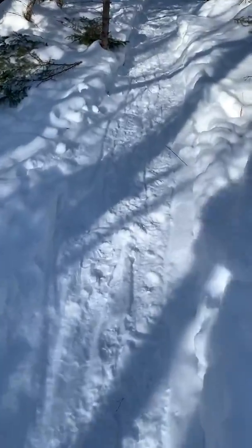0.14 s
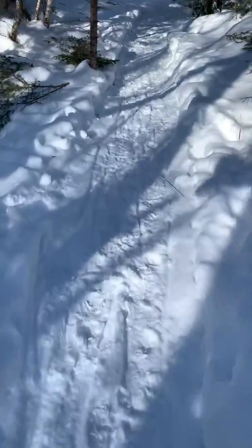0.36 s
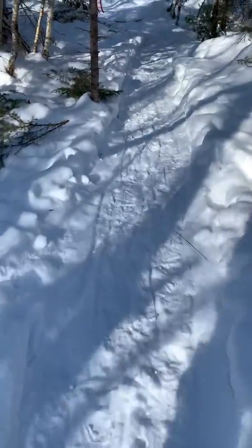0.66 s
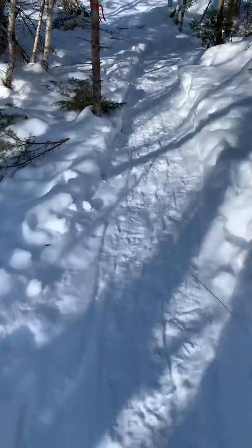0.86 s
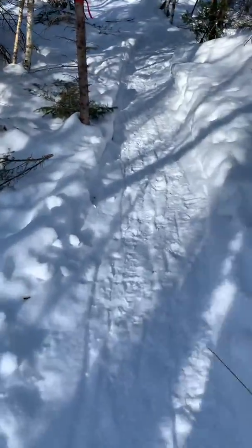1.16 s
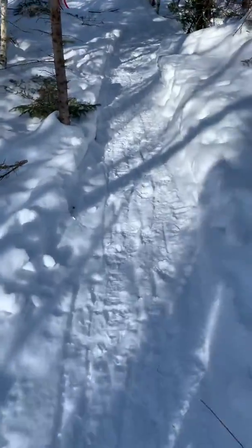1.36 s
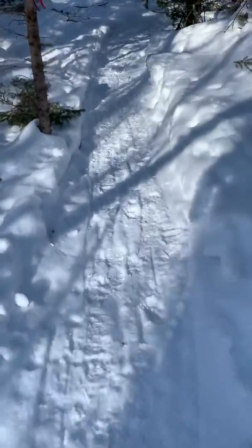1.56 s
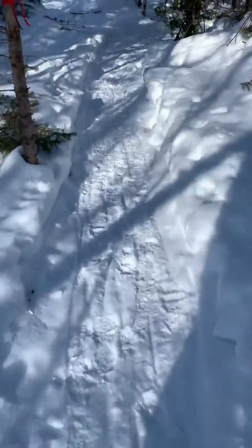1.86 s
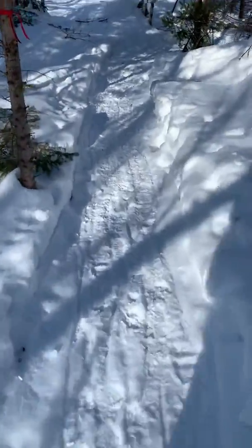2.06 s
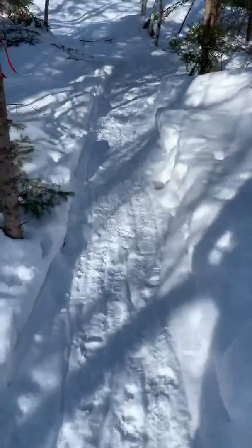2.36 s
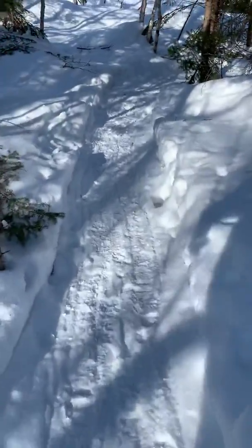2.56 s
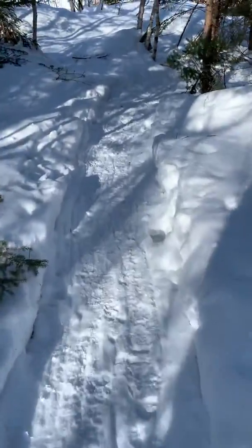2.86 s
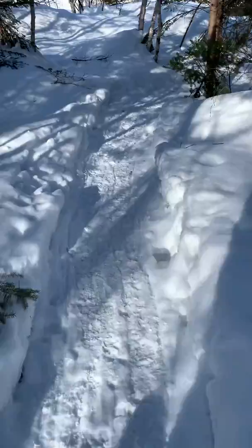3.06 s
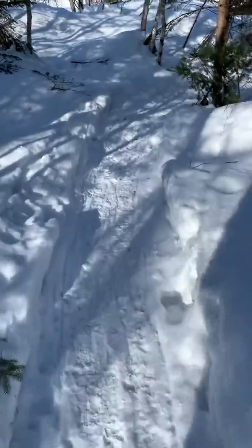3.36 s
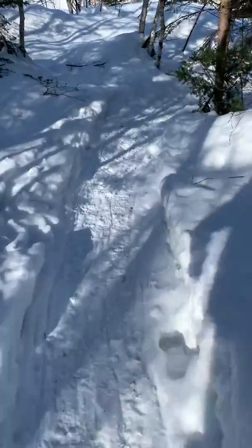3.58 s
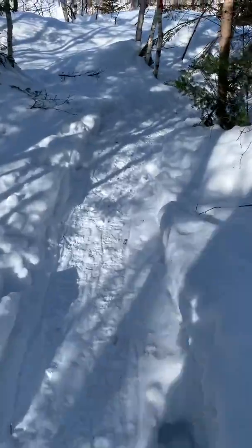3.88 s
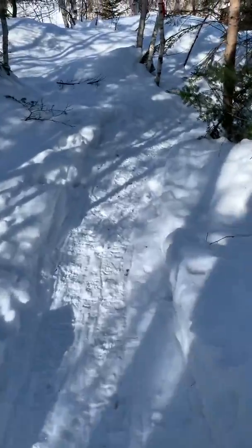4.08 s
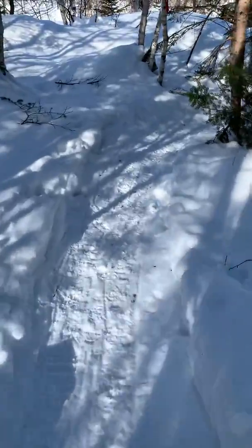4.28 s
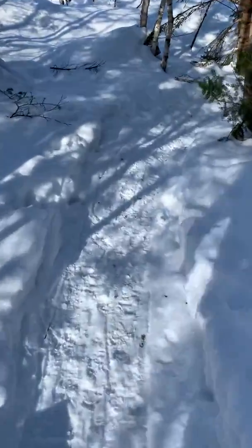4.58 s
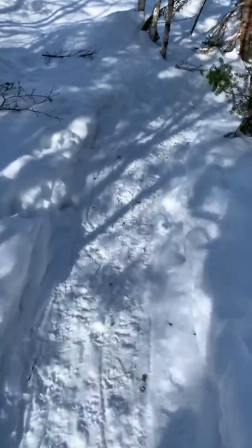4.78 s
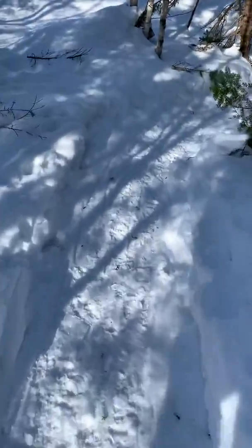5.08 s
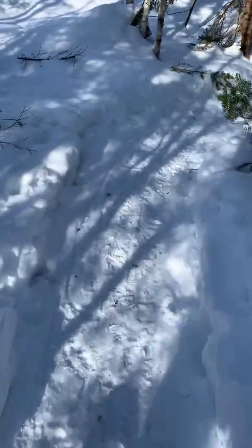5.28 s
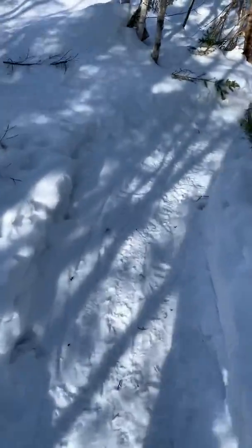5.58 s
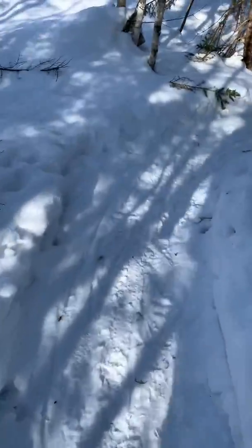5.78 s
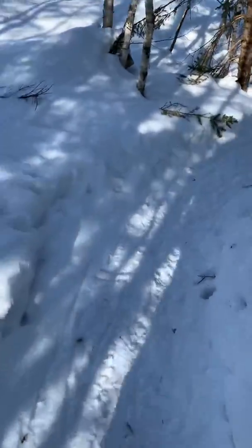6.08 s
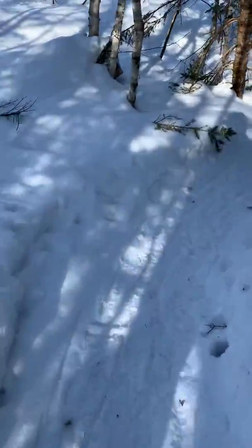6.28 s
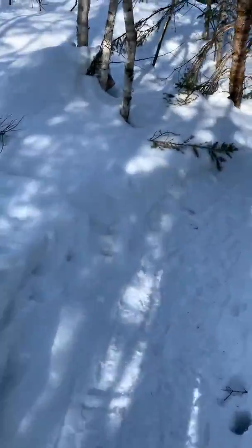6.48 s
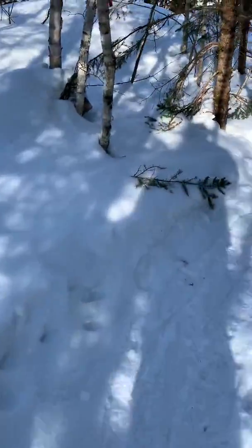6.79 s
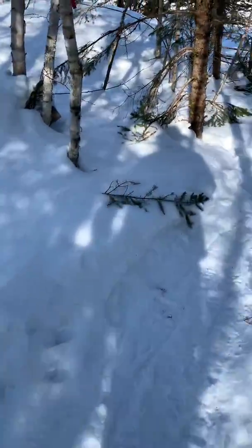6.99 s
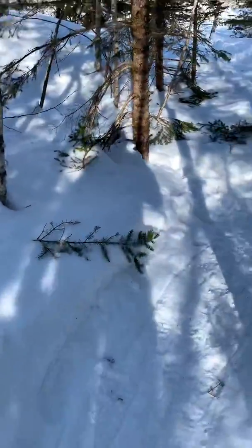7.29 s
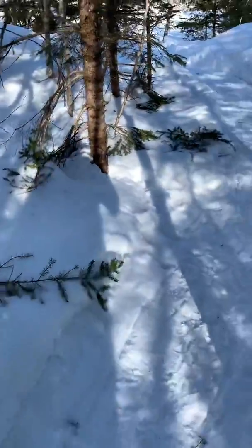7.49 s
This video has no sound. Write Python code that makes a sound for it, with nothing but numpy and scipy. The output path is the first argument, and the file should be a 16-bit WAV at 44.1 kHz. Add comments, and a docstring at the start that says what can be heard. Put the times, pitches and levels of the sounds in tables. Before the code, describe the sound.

Boots walk steadily over crusty snow in open air, starting with a faint scuff before the first step. Hollow mid-pitched knocks and bright icy snaps break through dense, gritty crunching, then each step dies quickly into near silence with small scuffs and sparse crumbs ticking. A handheld phone picks it up from above in narrow stereo, without echo, with a slight low jolt early on.

```python
"""A packed snow trail in a still forest, heard on a phone at chest height pointing down at the feet.
First the trailing boot brushes the snow: soft noise and hollow resonances, again between later steps.
Then come the footfalls, heel before ball: dull falling knocks of crust, a crunch of many small ringing
breaks, a fizz of dense tiny clicks as ice grains crush, and a low noise thud from the ground.
Low jolts of the phone pass early on, bright snaps throughout; two ports hear it all a little apart."""
import sys
import numpy as np
from scipy import signal
from scipy.fft import rfft, irfft
from scipy.io import wavfile
from scipy.ndimage import uniform_filter1d

SR = 44100
rng = np.random.default_rng(int(sys.argv[2]) if len(sys.argv) > 2 else 0)


def output_pcm(signal):
    """Save a mono or channel-first signal as 16-bit PCM at the path in sys.argv[1].

    Samples are clipped to [-1, 1] before scaling.
    """
    pcm = np.clip(np.atleast_2d(signal).T, -1, 1) * 32767
    wavfile.write(sys.argv[1], SR, np.round(pcm).astype(np.int16))


N = 336924
STEP = 16  # samples per point of a level curve

# Heel, then ball of the foot, pressing into the trail; levels before the sag under load:
# start_s, rise_s, length_s, fizz_db, soft_crunch_db, hard_crunch_db, thud_db
PRESSES = [(0.25, 0.09, 0.19, -18.5, -42, -28.5, -68), (0.38, 0.058, 0.076, -19.5, -24.5, -23, -33.5),
           (0.748, 0.069, 0.11, -18.5, -62, -28, -63), (0.845, 0.055, 0.15, -18, -26, -28, -38),
           (1.299, 0.081, 0.11, -11, -54, -21, -56), (1.411, 0.0035, 0.1, -29.5, -34, -32, -43.5),
           (1.85, 0.11, 0.16, -17.5, -53, -25, -44), (2.007, 0.054, 0.073, -20.5, -21, -30.5, -34),
           (2.455, 0.029, 0.21, -21.5, -33.5, -26, -44), (2.566, 0.041, 0.073, -23.5, -27, -25.5, -45),
           (3.019, 0.025, 0.083, -16.5, -29.5, -25.5, -31.5), (3.113, 0.031, 0.081, -23.5, -28.5, -31, -36),
           (3.553, 0.11, 0.21, -16, -29, -29.5, -42), (3.694, 0.07, 0.094, -18.5, -25.5, -22, -28.5),
           (4.127, 0.019, 0.19, -21.5, -51, -27.5, -49), (4.24, 0.094, 0.064, -17, -22, -19, -49),
           (4.684, 0.028, 0.2, -16.5, -27, -25, -60), (4.785, 0.036, 0.083, -23, -27.5, -24.5, -38),
           (5.222, 0.084, 0.14, -15.5, -29, -24, -63), (5.348, 0.069, 0.048, -16.5, -17.5, -21, -36),
           (5.764, 0.11, 0.15, -14.5, -22.5, -24, -63), (5.909, 0.03, 0.066, -20.5, -22.5, -23, -33),
           (6.299, 0.087, 0.15, -11.5, -57, -19, -40), (6.415, 0.049, 0.1, -23.5, -22, -35.5, -42),
           (6.92, 0.015, 0.11, -21.5, -39, -28.5, -73), (7.037, 0.016, 0.1, -22, -36, -27, -70),
           (7.481, 0.05, 0.19, -20, -33.5, -28.5, -42)]
# Resonances of soft crust as the ports colour it: pitch_hz, width_hz, relative_db
SOFT_CRUST = [(347, 150, -2.5), (533, 97, 4.5), (764, 204, -1.5)]
# Resonances of the harder icy layer: pitch_hz, width_hz, relative_db
HARD_CRUST = [(1390, 1670, -1.5), (1843, 340, -2)]
SOFT_SAG, HARD_SAG = 100, 75.6  # fading while the boot bears down (dB per s)
SOFT_REST_DB, HARD_REST_DB = -53.5, -67.5  # the trailing foot between contacts
CRACKLE_DB = 0.5  # separate small breaks inside a step, relative to both layers


def crunch():
    """Soft crust and its harder icy layer give way together under the load of the foot."""
    drive = clumps(8, 3.5)
    fitful = clumps(20, 1.27)  # loose snow settles in fits and starts
    soft = contact(PRESSES, column=4, sag_db_per_s=SOFT_SAG, rest_db=SOFT_REST_DB) * fitful
    soft = soft + crumbling(t60=0.13)
    hard = contact(PRESSES + SCUFFS, column=5, sag_db_per_s=HARD_SAG, rest_db=HARD_REST_DB) * fitful
    hard = hard + gain_of(-2.0) * crumbling(t60=0.03)
    small = gain_of(CRACKLE_DB) * np.sqrt(soft * hard) * crackles()
    soft_breaks = breaks(SOFT_CRUST, 700, 3.75, drive)
    hard_breaks = breaks(HARD_CRUST, 1100, 2.06, drive)
    return soft * soft_breaks + hard * hard_breaks + small


CRACKLES_PER_S, CRACKLE_HZ = 170, (430, 950)  # total over all notes; lowest and highest note


def crackles():
    """Small uneven versions of the loud breaks, to be scattered through every step."""
    notes = np.geomspace(*CRACKLE_HZ, num=6)
    shapes = [knock(hz, 0.1, -9.5, turn) for hz, turn in zip(notes, rng.random(len(notes)))]
    per_note = CRACKLES_PER_S / len(notes)
    return evened(sum(signal.oaconvolve(clicks(per_note, 1.9), shape)[:N] for shape in shapes))


# Slabs of crust breaking; levels before the trims in knock():
# start_s, level_db, pitch_hz, bright_db
CRACKS = [(0.226, -16, 530, -53), (0.2595, -5, 575, -39), (0.272, -16, 264, -31), (0.309, -13, 537, -17.5),
          (0.333, -18, 770, -36), (0.404, -8.5, 700, -25), (0.44, -15, 470, -16), (0.474, -13, 547, -42),
          (0.65, -17, 527, -45), (0.769, -19, 530, -32), (0.791, 1, 512, -6.5), (0.899, -7, 790, -18),
          (0.924, -12, 635, -16), (1.195, -26, 510, -45), (1.3138, -8, 570, -11.5),
          (1.3437, -11.5, 640, -9), (1.367, -11, 930, -8), (1.402, -9.5, 480, -30), (1.417, -11, 535, -11),
          (1.508, -19.5, 497, -35), (1.758, -19.5, 530, -18.5), (1.777, -12, 473, -14),
          (1.8551, -1.5, 630, -11.5), (1.903, 0.5, 563, -12), (2.031, -7.5, 515, -21),
          (2.067, -14, 484, -18), (2.08, -15, 617, -14.5), (2.142, -25, 640, -38), (2.216, -36, 600, -42),
          (2.285, -29, 610, -57), (2.332, -38, 594, -50), (2.263, -26, 815, -28), (2.302, -58, 620, -30),
          (2.381, -45, 540, -35), (2.419, -45, 697, -38), (2.454, -11, 570, -15.5), (2.468, -19, 577, -32),
          (2.483, -14.5, 485, -21), (2.585, -15, 510, -19), (2.616, -20, 600, -18), (2.919, -13, 450, -34),
          (3.023, -10, 523, -30), (3.134, -11, 640, -25), (3.161, -11.5, 730, -34), (3.481, -16, 536, -23),
          (3.582, -8, 570, -29), (3.691, -14, 564, -20), (3.728, -9.5, 550, -31), (3.799, -12, 606, -38),
          (3.966, -28, 517, -57), (4.067, -52, 507, -22.5), (4.092, -17, 507, -35),
          (4.1252, -2.5, 550, -19), (4.139, -7.5, 515, -13.5), (4.22, -18.5, 730, -21),
          (4.2555, -13, 726, -16.5), (4.2675, -1.5, 598, -15), (4.378, -40, 600, -30),
          (4.454, -34, 560, -37), (4.481, -35, 550, -33), (4.546, -49, 500, -50), (4.623, -17.5, 511, -38),
          (4.6835, -9, 596, -23), (4.717, -11.5, 694, -36), (4.7523, -35, 555, -5.5),
          (4.781, -41, 525, -13), (4.806, -14.5, 860, -23), (4.844, -16, 594, -11), (5.096, -24, 477, -50),
          (5.194, -24, 486, -59), (5.244, -3, 558, -42), (5.364, -18, 560, -31), (5.396, -13, 620, -28),
          (5.645, -28, 544, -32), (5.69, -14, 550, -22), (5.781, -14, 550, -31), (5.795, -6.5, 525, -12),
          (5.927, -12, 515, -26), (5.946, -7.5, 850, -14), (6.215, -15.5, 480, -46),
          (6.287, -20, 1060, -26), (6.33, -4.5, 554, -34), (6.48, -10.5, 525, -16), (6.512, -29, 515, -28),
          (6.563, -15.5, 556, -31), (6.672, -36, 560, -39), (6.697, -25, 580, -53),
          (6.722, -21.5, 500, -55), (6.855, -22, 534, -51), (6.919, -15.5, 780, -24), (6.93, -12, 506, -37),
          (6.995, -12, 595, -18), (7.054, -17, 625, -17), (7.061, -3, 648, -14), (7.069, -7, 1000, -31),
          (7.119, -4.5, 534, -18), (7.495, -29, 533, -34), (7.519, -15.5, 556, -24)]


def cracks():
    """The loud single breaks, each a knock on its slab's own note."""
    out = np.zeros(N)
    for (s, db, hz, bright_db), turn in zip(CRACKS, rng.random(len(CRACKS))):
        add(out, s, knock(hz, db, bright_db, turn))
    return out


def knock(hz, db, bright_db, turn):
    """A break in the crust: the high part arrives first and the pitch sinks to the slab's note."""
    t = np.arange(900) / SR
    sweep = hz * t + 1.564 * (1 - np.exp(-t / 0.00096))
    # a few cycles, then the snow damps it
    swell = (1 - np.exp(-(t / 0.0016) ** 2)) * np.exp(-(t / 0.0052) ** 2)
    body = np.sin(2 * np.pi * (sweep + turn)) * swell
    edge_level = (1 - np.exp(-t * 3000)) * gain_of(bright_db + 1.5 - 60 * t / 0.012)
    edge = np.sin(2 * np.pi * (1550 + 400 * turn) * t) * edge_level
    tick_level = gain_of(bright_db - 7.0 - 60 * t / 0.0055)
    tick = np.sin(2 * np.pi * (2600 * t + 900 * t * turn)) * tick_level
    return gain_of(db - 6.0) * body / abs(body).max() + edge + tick


DEBRIS_DB, DEBRIS_SHARE = -18.5, 0.95  # base level, plus this share of the crack's dB


def crumbling(t60, share=DEBRIS_SHARE):
    """Level of debris giving way after each slab breaks, until the boot lifts and the grinding stops."""
    out, t = np.zeros(N // STEP + 1), np.arange(0, .2, STEP / SR)
    for s, db, *_ in CRACKS:
        decay = gain_of(DEBRIS_DB + share * db - 60 * t / t60)
        add(out, s, decay * (1 - np.exp(-(t / 0.003) ** 2)), rate=SR / STEP)
    return per_sample(out) / np.sqrt(1 + (gain_of(-35.5) / grinding()) ** 2)


# Spectrum of crushed ice grains: pitch_hz, relative_db (per Hz)
FIZZ = [(800, -0.5), (2000, 3.5), (3500, 2), (6000, 2.5), (8000, -2), (11000, -3.5), (15000, -6.5),
        (20000, 5.5)]
SPRAY_DB = -29  # grains thrown up by a snap, before onset and decay


def fizz():
    """Ice grains crushed and sliding: very dense tiny clicks, sprayed up again by every snap."""
    grains = patchy(coloured(clicks(9000, 2.8) * clumps(6.0, 2.5), FIZZ))
    spray, t = np.zeros(N), np.arange(6000) / SR
    for s, _ in SNAPS:
        add(spray, s, gain_of(SPRAY_DB - 60 * t / 0.018) * (1 - np.exp(-t * 900)))
    return (grinding() + spray) * grains


FIZZ_SAG, FIZZ_REST_DB = 111.6, -59.5  # dB per s under load; trailing foot between contacts


def grinding():
    """How hard ice grains are being crushed, by presses and scuffs alike."""
    return contact(PRESSES + SCUFFS, column=3, sag_db_per_s=FIZZ_SAG, rest_db=FIZZ_REST_DB)


PATCHY_DB = 3  # depth of the random swells in the fizz


def patchy(x):
    """Random patches of pitch and time swell and sink."""
    z = signal.stft(x, nperseg=256)[2]
    across_pitch = uniform_filter1d(rng.standard_normal(z.shape), size=4, axis=0)
    patches = evened(uniform_filter1d(across_pitch, size=5, axis=1))
    return evened(signal.istft(z * gain_of(PATCHY_DB * patches), nperseg=256)[1][:N])


# Spectrum of the packed base: pitch_hz, relative_db (per Hz)
THUD = [(25, -65), (50, -3.5), (130, 0.5), (260, -0.5), (400, -10.5), (900, -57)]
THUD_SAG, THUD_REST_DB = 40, -54.5  # dB per s under load; trailing foot between contacts


def thud():
    """The packed base gives dully under the walker's weight and under each slab that breaks."""
    lumps = coloured(rng.standard_normal(N) * clumps(12, 2.5), THUD)
    weight = contact(PRESSES, column=6, sag_db_per_s=THUD_SAG, rest_db=THUD_REST_DB)
    return (weight + gain_of(-5.5) * crumbling(t60=0.14, share=1.0)) * lumps


# Ice snapping; level before an 11 dB trim and the onset: start_s, level_db
SNAPS = [(0.116, -29), (0.271, -24), (0.9394, -0.5), (1.186, -37), (1.2061, -9.5), (1.281, -24),
         (1.323, -12), (1.34, -29), (1.686, -44), (1.755, -26), (1.777, -9), (2.3726, -22), (2.455, -38),
         (2.917, -35), (2.945, -18), (3.038, -9), (3.172, 0.5), (4.068, -33), (4.138, -20), (4.2555, -25),
         (4.621, -13), (4.6428, -6.5), (4.699, -28), (5.254, -14.5), (5.691, -19), (5.741, -36),
         (6.214, -11), (6.311, -12), (6.5017, -6), (6.83, -20.5), (6.928, -7), (7.054, -27)]
# Snaps come in from another angle: samples the right port lags, share of power heard by one port only
SNAP_LAG, SNAP_OWN = 13, .5


def snaps():
    """Bright noise bursts a couple of milliseconds long."""
    out, t = np.zeros((2, N)), np.arange(400) / SR
    for (s, db), (both, *own) in zip(SNAPS, rng.standard_normal((len(SNAPS), 3, 400))):
        level = gain_of(db - 11.0 - 60 * t / 0.0065) * (1 - np.exp(-t * 8000))
        for port in range(2):
            noise = np.sqrt(1 - SNAP_OWN) * both + np.sqrt(SNAP_OWN) * own[port]
            bright = noise - 0.7 * np.roll(noise, 2)
            add(out[port], s + port * SNAP_LAG / SR, level * bright)
    return out


# An ice chip rings for a few cycles: start_s, level_db, pitch_hz
PINGS = [(4.2548, -21, 4200), (5.2522, -22.5, 3100)]


def pings():
    """Brief pitched ticks of ice: a sine under a bell-shaped swell."""
    out, t = np.zeros((2, N)), np.arange(200) / SR
    for s, db, hz in PINGS:
        chip = gain_of(db) * np.exp(-(t / 0.0007 - 2) ** 2) * np.sin(2 * np.pi * hz * t)
        for port in range(2):
            add(out[port], s + port * SNAP_LAG / SR, chip)
    return out


# The swinging boot brushes the snow; levels before the sag:
# start_s, rise_s, length_s, fizz_db, hollow_db, hard_crunch_db
SCUFFS = [(0, 0.0021, 0.087, -54.5, -40.5, -51.5), (0.071, 0.02, 0.038, -46, -37, -55),
          (0.115, 0.0046, 0.011, -38.5, -46, -68), (0.202, 0.021, 0.043, -32.5, -28.5, -69),
          (0.489, 0.017, 0.02, -36.5, -49, -38.5), (0.628, 0.012, 0.021, -35, -26, -39),
          (1.179, 0.02, 0.027, -31, -25, -63), (1.242, 0.038, 0.047, -36.5, -35, -63),
          (1.08, 0.0082, 0.056, -74, -38, -50), (1.7, 0.064, 0.095, -34, -63, -41),
          (2.121, 0.016, 0.027, -42.5, -41, -47.5), (2.237, 0.006, 0.032, -45, -91, -56),
          (2.362, 0.015, 0.03, -33, -30.5, -62), (2.433, 0.008, 0.013, -52, -41, -53),
          (2.912, 0.0095, 0.0014, -31.5, -26, -31), (2.932, 0.0085, 0.014, -45, -25.5, -41),
          (2.973, 0.012, 0.077, -34.5, -32.5, -38.5), (3.238, 0.028, 0.028, -34, -32, -36.5),
          (3.426, 0.12, 0.2, -23.5, -30, -45), (3.905, 0.014, 0.016, -42, -38, -69),
          (4.066, 0.019, 0.028, -28, -43, -41), (4.458, 0.023, 0.019, -41.5, -33, -42),
          (4.533, 0.0082, 0.028, -41.5, -36, -69), (4.612, 0.019, 0.057, -30.5, -28, -37),
          (5.085, 0.015, 0.047, -43, -61, -69), (5.185, 0.013, 0.037, -33.5, -29.5, -57),
          (5.625, 0.072, 0.076, -31.5, -26.5, -50), (6.08, 0.013, 0.014, -44.5, -32.5, -46),
          (6.202, 0.017, 0.029, -30.5, -45, -68), (6.28, 0.0089, 0.004, -39, -56, -36),
          (6.535, 0.043, 0.004, -21, -46, -23.5), (6.748, 0.016, 0.044, -42, -37, -51),
          (6.823, 0.0086, 0.044, -36, -37.5, -76), (7.24, 0.018, 0.019, -39.5, -39, -75),
          (7.364, 0.047, 0.054, -34, -40.5, -54)]
# Resonances of the boot skimming loose snow: pitch_hz, width_hz, relative_db
HOLLOW = [(546, 64, 7.5), (370, 170, -7), (774, 380, -4.5)]


def scuffs():
    """A light brush sounds a rounded hollow note, smoother than the crunch of a full step."""
    level = contact(SCUFFS, column=4, sag_db_per_s=SOFT_SAG, rest_db=-79)
    rounded = uniform_filter1d(level, size=600, origin=250)
    return rounded * breaks(HOLLOW, 2500, 3.9, clumps(10.0, 1.5), wander=0.037)


CRUMBS_PER_S, CRUMBS_DB = 30, -51.5  # rate for each resonance; level of the whole layer


def crumbs():
    """Sparse ticks of loose icy crumbs dropping off the boots, heard in the gaps between steps."""
    return gain_of(CRUMBS_DB) * breaks(HARD_CRUST + HOLLOW[:1], CRUMBS_PER_S, 2.2, clumps(44, 10.0))


# The hand jolts the phone: center_s, width_s, level_db, pitch_hz
BUMPS = [(0.733, 0.014, -26, 58), (0.769, 0.02, -30, 61), (0.813, 0.015, -30, 95)]


def bump():
    """Short low wobbles: cosines under bell-shaped swells."""
    out, t = np.zeros(N), np.arange(N) / SR
    for s, width, db, hz in BUMPS:
        out += gain_of(db) * np.exp(-((t - s) / width) ** 2) * np.cos(2 * np.pi * hz * (t - s))
    return out


# Spectrum of the still forest: pitch_hz, relative_db (per Hz)
AIR = [(30, -29), (55, 20.5), (100, 14.5), (500, -34), (2000, -2.5), (6000, -5.5), (16000, -63)]
AIR_DB = -55.5


def still_air():
    """A steady bed of coloured noise behind the steps."""
    return gain_of(AIR_DB) * coloured(rng.standard_normal(N), AIR)


RISE_SHAPE = 1.24  # exponent of the load coming on
LIFT_DB_PER_S = 616  # quick lift
SETTLE_DB, SETTLE_DB_PER_S = -28, 45  # loose snow settling afterwards


def contact(rows, column, sag_db_per_s, rest_db):
    """Level of one layer: every contact rises, sags under load, drops at the lift and settles."""
    power, t = np.zeros(N // STEP + 1), np.arange(0, .5, STEP / SR)
    for row in rows:
        s, rise, length = row[:3]
        after = np.maximum(t - length, 0)
        lift = gain_of(-LIFT_DB_PER_S * after) + gain_of(SETTLE_DB - SETTLE_DB_PER_S * after)
        loading = np.minimum(t / max(rise, .002), 1) ** RISE_SHAPE
        held = loading * gain_of(-sag_db_per_s * np.minimum(t, length))
        add(power, max(s, 0), (gain_of(row[column]) * held * lift) ** 2, rate=SR / STEP)
    return per_sample(np.sqrt(power)) + gain_of(rest_db) * clumps(26.5, 9.25)


WANDER, WANDER_MS = 0.15, 24.2  # resonances drift by about this share as the snow packs and shifts


def breaks(modes, per_s, spread_db, drive, wander=WANDER):
    """Random small breaks strike each broad resonance, which wanders in pitch."""
    out = np.zeros(N)
    for hz, width, db in modes:
        turn = np.exp(2j * np.pi * np.cumsum(hz * (1 + wander * sway(WANDER_MS))) / SR)
        # the second, faster decay softens each onset
        poles = np.exp(-np.pi * np.array([width, width + 480]) / SR)
        strikes = clicks(per_s, spread_db) * drive
        ringing = turn * signal.lfilter([1], np.poly(poles), strikes / turn)
        out += gain_of(db) * evened(ringing.imag)
    return evened(out)


def clicks(per_s, spread_db):
    """Random clicks of either sign, most small and a few large."""
    chance, coin = rng.random((2, N))
    hit, out = chance < per_s / SR, np.zeros(N)
    size = np.minimum(-np.log(chance[hit] * SR / per_s), 4.0)
    out[hit] = gain_of(spread_db * size) * np.sign(coin[hit] - .5)
    return out


def clumps(ms, depth_db):
    """Grains give way in bunches: a random gain that swells and sinks."""
    return gain_of(depth_db * sway(ms))


def sway(ms):
    """Smooth bounded chance that holds for some milliseconds."""
    size = max(round(ms * SR / 1000 / STEP), 2)
    slow = evened(uniform_filter1d(uniform_filter1d(rng.standard_normal(N // STEP + 1), size), size))
    return per_sample(1.5 * np.tanh(slow / 1.5))


def per_sample(points):
    """Joins the points of a level curve into one value per sample."""
    return np.interp(np.arange(N) / STEP, np.arange(len(points)), points)


def gain_of(db):
    """Decibels to amplitude."""
    return 10 ** (np.asarray(db) / 20)


def evened(x):
    """Scales to rms 1."""
    return x / np.sqrt(np.mean(x ** 2) + 1e-20)


def coloured(x, points):
    """Shapes a signal by a spectrum drawn on a log-frequency axis, then evens its level."""
    f, db = np.transpose(points)
    hz = np.fft.rfftfreq(len(x), 1 / SR)
    return evened(irfft(rfft(x) * gain_of(np.interp(np.log(hz + 1), np.log(f), db)), len(x)))


def add(mix, s, sound, rate=SR):
    """Mixes a sound in at time s."""
    part = mix[round(s * rate):][:len(sound)]
    part += sound[:len(part)]


def trail():
    """Everything underfoot and the jolts of the phone, over the still air."""
    underfoot = crunch() + cracks() + fizz() + thud() + scuffs() + crumbs()
    return underfoot + bump() + still_air()


# The port pair, before ports() adjusts lag and likeness in the treble:
# pitch_hz, right_lag_radians, left_over_right_db, likeness
PORTS = [(0, 0, .3, .9), (150, .03, .6, .99), (400, .2, .4, .985), (800, .7, .5, .95), (1200, 1.2, -3, .8),
         (1500, -.5, -4.5, .6), (1900, .2, 0, .96), (2400, 1.3, 0, .97), (3300, 1.7, 0, .97),
         (4650, np.pi, 0, .995), (17400, 7 * np.pi, 0, .995)]


def ports(first, second):
    """The right port lags, so the treble comes partly in step and partly opposed across the pair."""
    hz = np.fft.rfftfreq(N, 1 / SR)
    f, *columns = np.transpose(PORTS)
    lag, lean_db, same = (np.interp(hz, f, c) for c in columns)
    same = np.clip(same - 0.12 * np.sin(lag) ** 2 * (hz > 2000), 0, 1)
    lag = lag - 0.36 * np.sin(2 * lag) * (hz > 3800)
    shared = np.sqrt((1 + same) / 2) * rfft(first)
    opposed = np.sqrt((1 - same) / 2) * rfft(second)
    left = (shared + opposed) * gain_of(lean_db / 2)
    right = (shared - opposed) * gain_of(-lean_db / 2) * np.exp(-1j * lag)
    return irfft(np.array([left, right]), N)


def scene():
    """Two independent renderings of the trail, shared between the ports for width, with snaps and pings."""
    return ports(trail(), trail()) + snaps() + pings()


EDGE_HZ = 15750  # upper band limit


def record(dry):
    """Small microphone capsules drop the deepest bass; then the band limit."""
    bass_cut = 1 / np.sqrt(1 + (53 / (np.fft.rfftfreq(N, 1 / SR) + 1)) ** 6)
    pair = irfft(rfft(dry) * bass_cut, N)
    low_pass = signal.firwin(511, EDGE_HZ, window=("kaiser", 9), fs=SR)
    return signal.oaconvolve(pair, low_pass[None], "same")


dry = scene()
out = record(dry)
output_pcm(out)
```